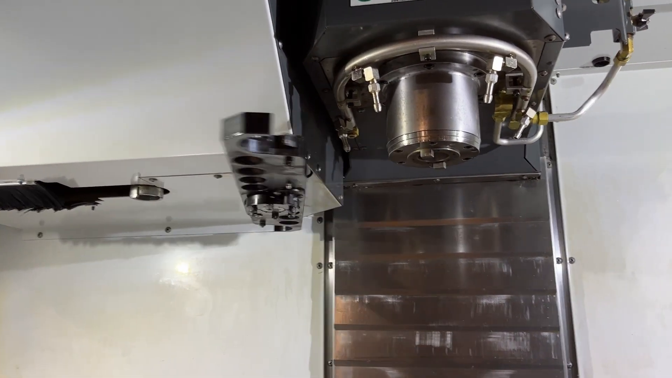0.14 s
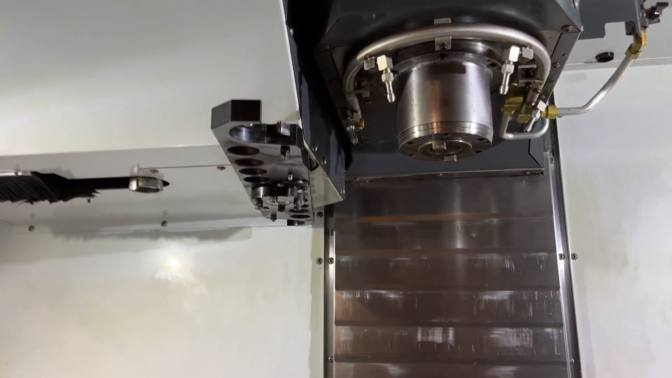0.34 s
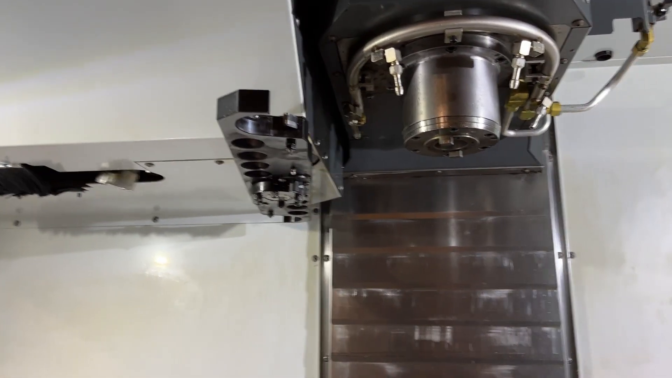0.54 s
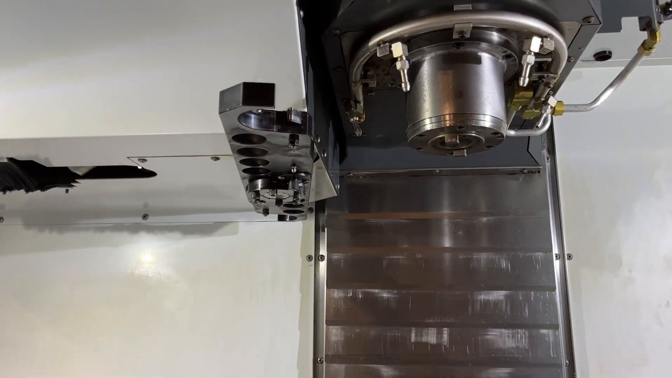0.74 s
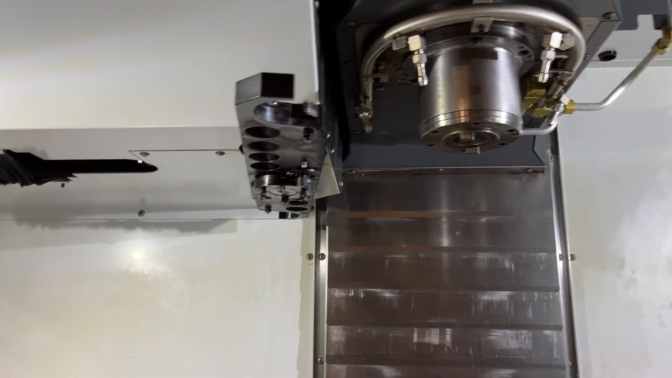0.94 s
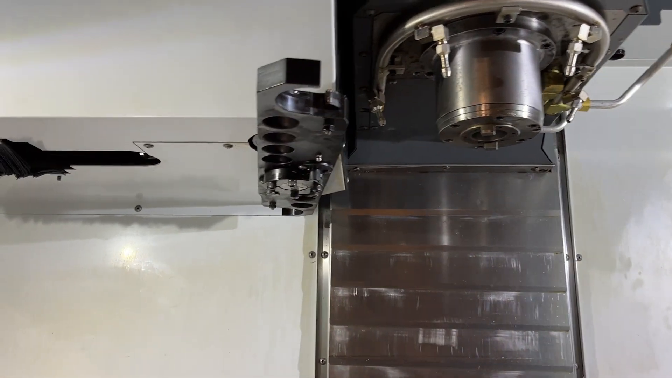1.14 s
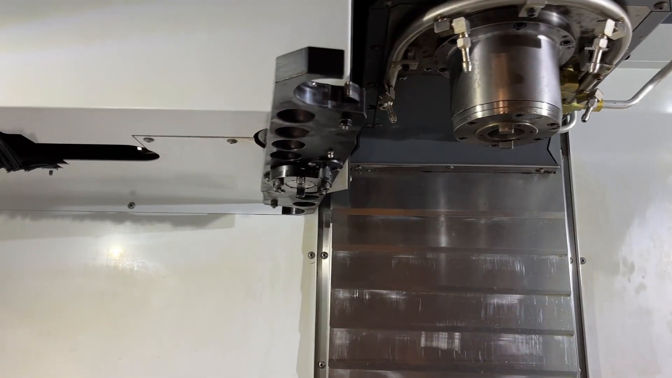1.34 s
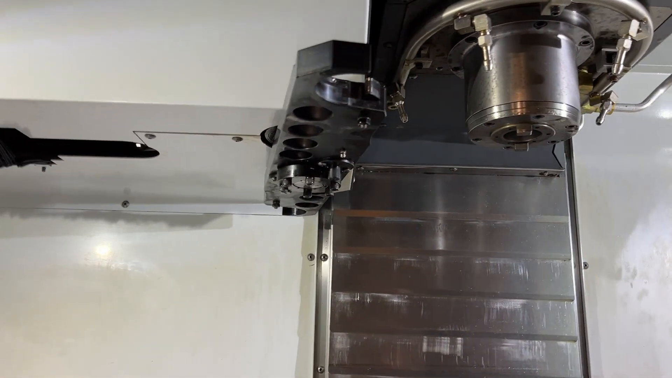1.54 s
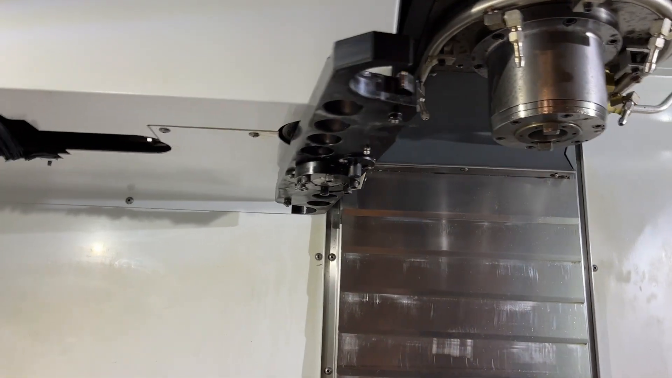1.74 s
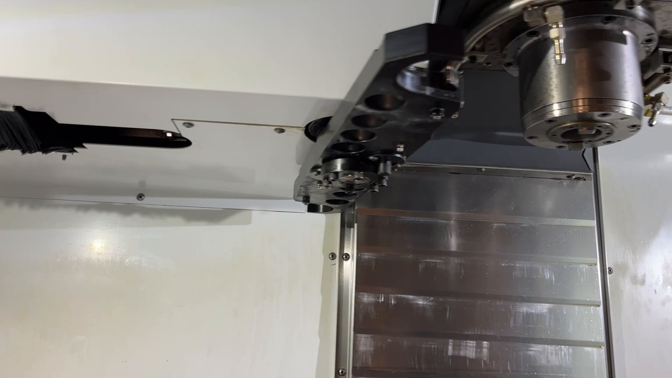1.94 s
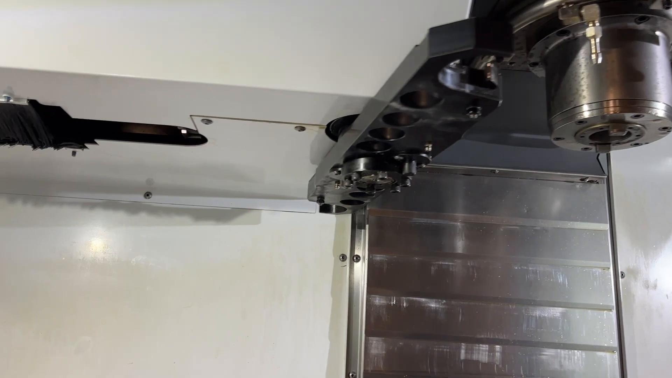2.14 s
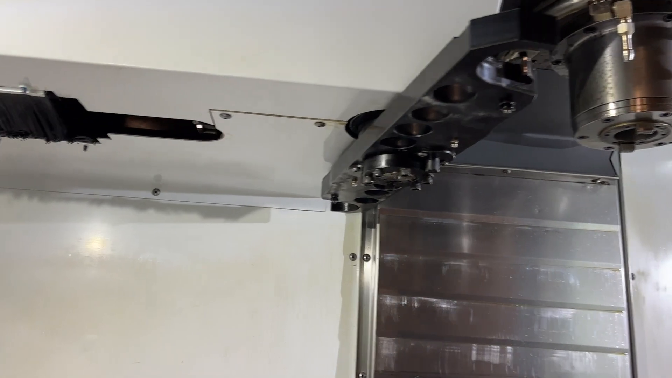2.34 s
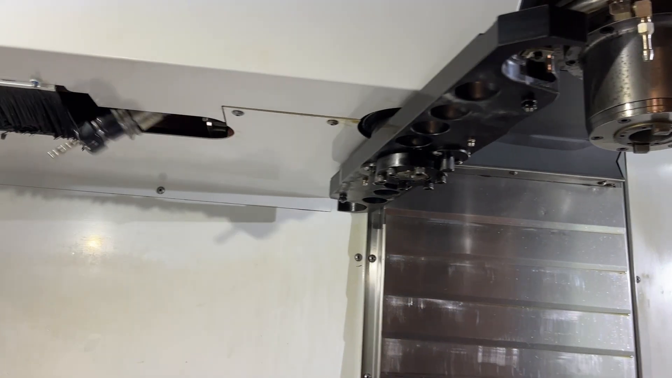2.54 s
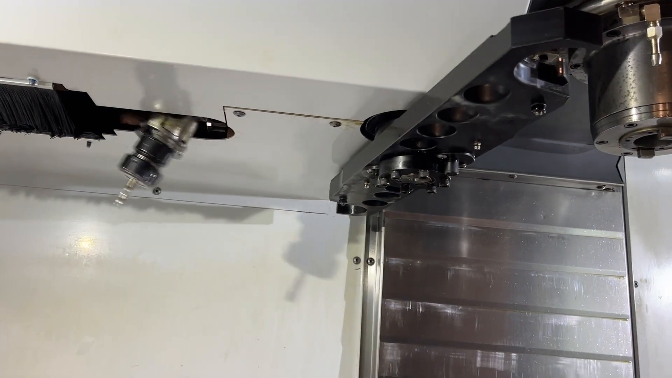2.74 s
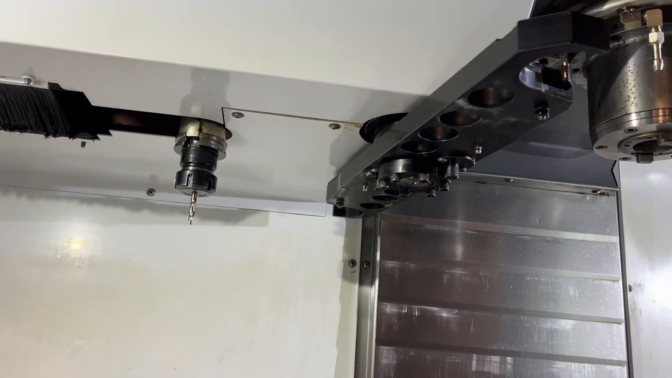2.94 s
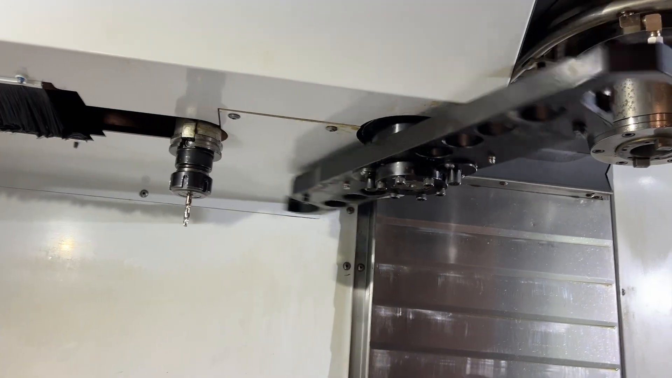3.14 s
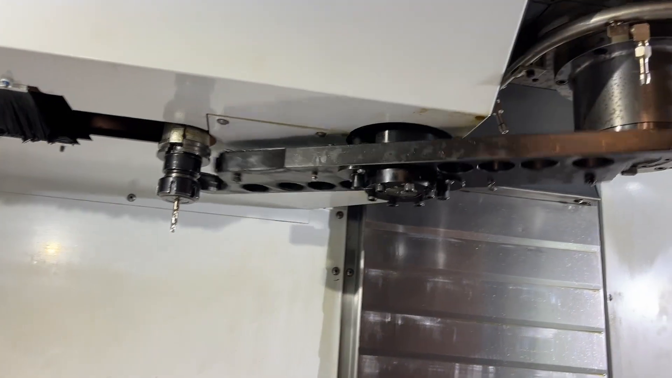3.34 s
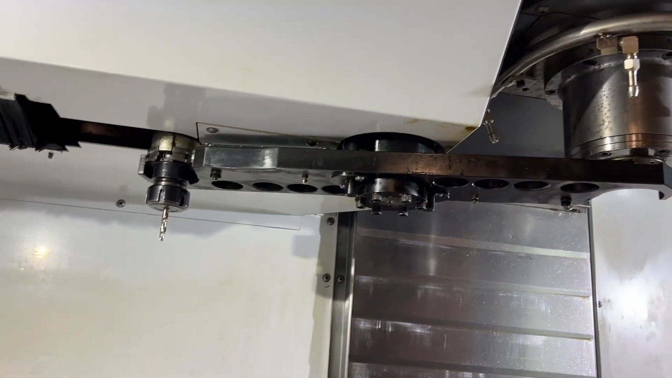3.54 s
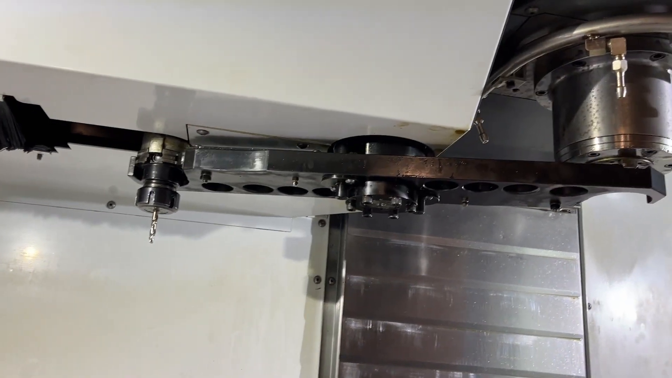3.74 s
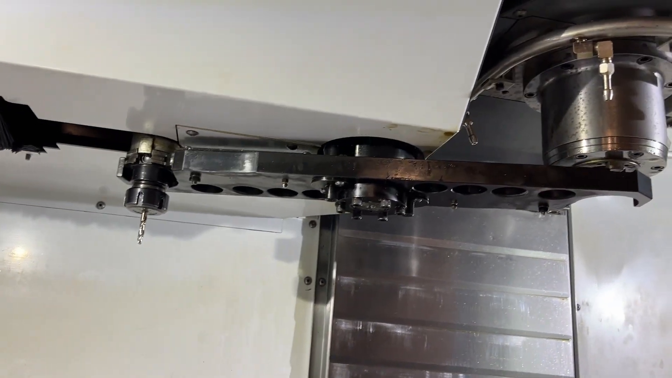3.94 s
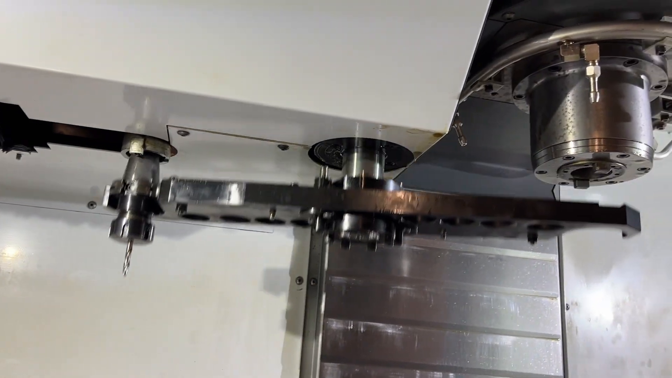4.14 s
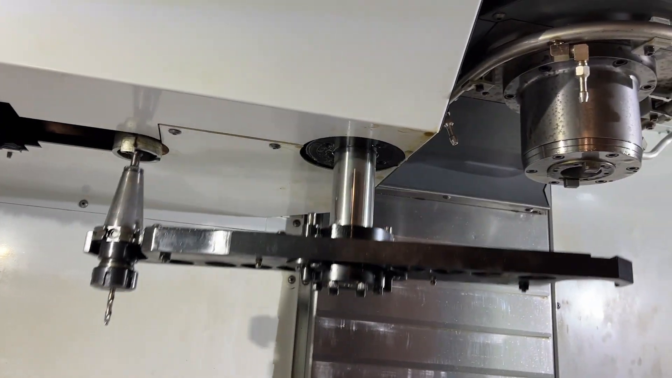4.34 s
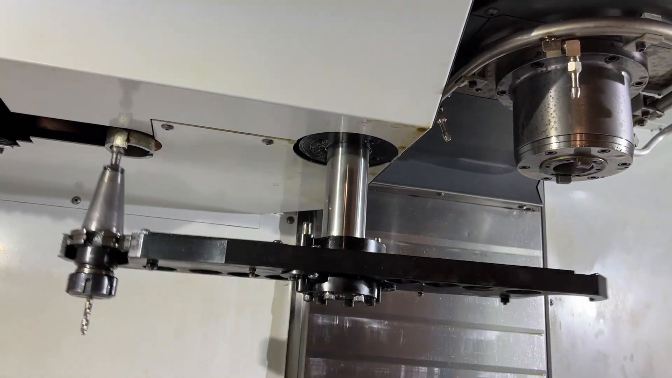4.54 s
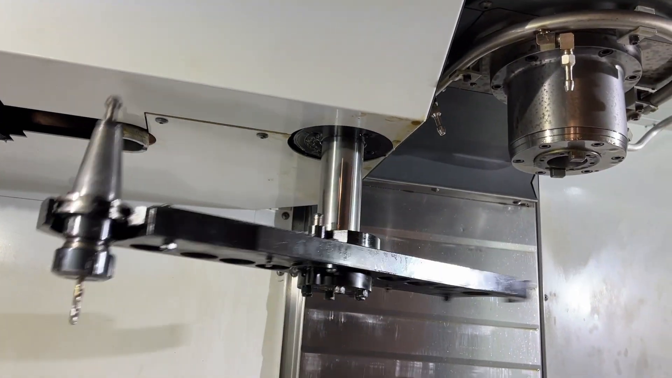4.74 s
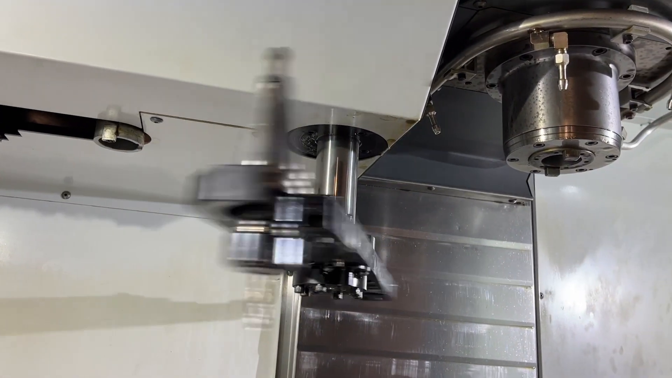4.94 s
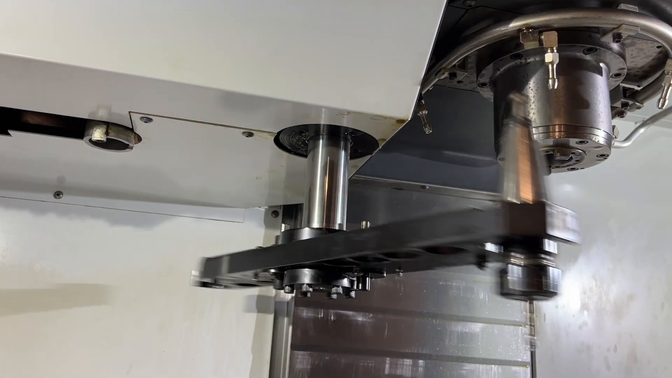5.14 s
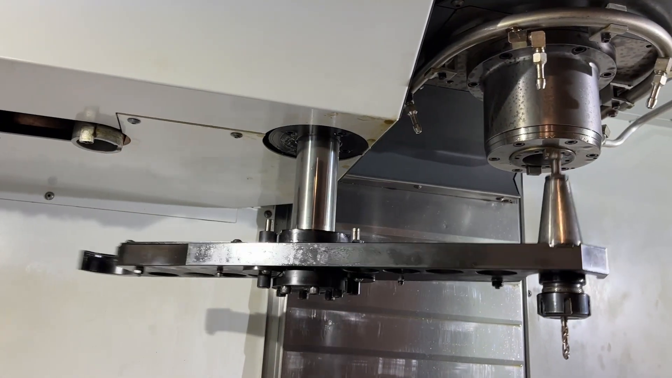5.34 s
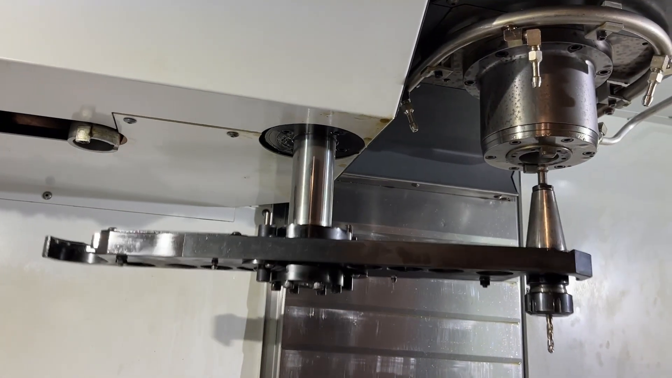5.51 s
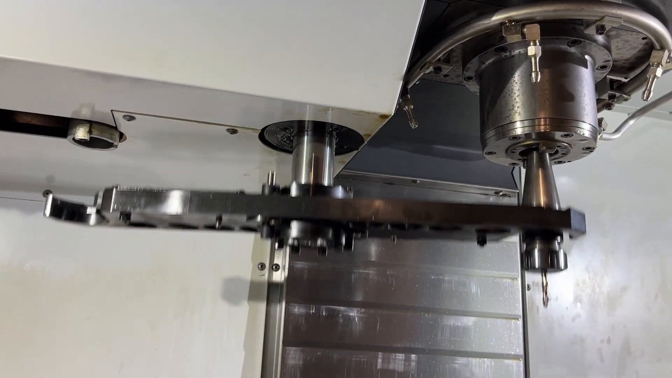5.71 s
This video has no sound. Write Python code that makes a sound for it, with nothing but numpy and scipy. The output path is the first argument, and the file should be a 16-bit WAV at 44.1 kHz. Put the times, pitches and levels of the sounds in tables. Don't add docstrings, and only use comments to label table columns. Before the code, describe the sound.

A machine tool changer hisses and clatters, bangs hard twice, then a loud whistling air blast sings through the empty spindle to the end.

```python
import sys
import numpy as np
from scipy import signal
from scipy.fft import rfft, irfft, next_fast_len
from scipy.io import wavfile
from scipy.ndimage import uniform_filter1d, map_coordinates

SR = 44100
rng = np.random.default_rng(int(sys.argv[2]) if len(sys.argv) > 2 else 0)


def put_to_file(sound):
    columns = np.atleast_2d(sound).T
    safe = np.clip(columns, -1, 1)
    whole_steps = np.round(safe * 32767)
    wavfile.write(sys.argv[1], SR, whole_steps.astype(np.int16))


def volts(x):
    e = np.asarray(x, float) / 20
    return 10 ** e


N = 258867
M = next_fast_len(N + SR // 3)
HZ = np.fft.rfftfreq(M, 1 / SR)


def unit(x):
    return x / np.sqrt(np.mean(np.abs(x) ** 2) + 1e-20)


def along(points, hz):
    f, v = np.transpose(points)
    return np.interp(np.log(hz + 1), np.log(f + 1), v)


def curves(rows):
    s, *cols = np.transpose(rows)
    t = np.arange(N) / SR
    lasts = 1. * (t >= s[0]) * (t <= s[-1] + 1 / SR)
    return [np.interp(t, s, c) for c in cols] + [uniform_filter1d(lasts, size=400, mode="nearest")]


def past(s, knee):
    return knee * np.logaddexp(0, (np.arange(N) / SR - s) / knee)


def grown(s, rise):
    return 1 - np.exp(-np.clip(np.arange(N) / SR - s, 0, None) / rise)


def wobble(rate):
    coarse = np.arange(0, N + 32, 32)
    knots = rng.standard_normal(int(N * rate / SR) + 5)
    return np.interp(np.arange(N), coarse, map_coordinates(knots, [coarse * rate / SR]))


def filtered(x, response):
    return irfft(rfft(x, M) * response(HZ), M)[..., :N]


def modes(table, flip=-1):
    def response(f):
        total = 0
        for k, (centre, width, db) in enumerate(table):
            damping = 1j * f * width
            total = total + flip ** k * volts(db) * damping / (centre * centre - f * f + damping)
        return total
    return response


def noise(response, count=2):
    real, imag = rng.standard_normal((2, count, len(HZ)))
    return unit(irfft((real + 1j * imag) * response(HZ), M)[:, :N])


def narrow(centre_hz, width_hz):
    slow = noise(lambda f: 1 / (1 + (f / width_hz) ** 2), count=4)
    turn = 2 * np.pi * np.cumsum(centre_hz * np.ones(N)) / SR
    return unit(slow[:2] * np.cos(turn) + slow[2:] * np.sin(turn))


def wavering(centre_hz, drift_hz, rate):
    turn = 2 * np.pi * np.cumsum(centre_hz + drift_hz * wobble(rate)) / SR
    return np.sqrt(2) * np.array([np.sin(turn), np.cos(turn)])


def bursts(rows):
    out, t = np.zeros((2, N + SR)), np.arange(SR // 3) / SR
    for s, db, rise, t60, hz in rows:
        burst = volts(db - 60 * t / t60) * (1 - np.exp(-t / rise)) * rng.standard_normal((2, len(t)))
        out[:, round(s * SR):][:, :len(t)] += signal.lfilter(*signal.iirpeak(hz, 1.1, SR), burst)
    return out[:, :N]


def cabinet(x, t60, wet_db):
    t = np.arange(SR // 3) / SR
    tail = rng.standard_normal(len(t)) * volts(-60 * t / t60) * (t > .002)
    tail = tail / np.linalg.norm(tail)
    walls = signal.fftconvolve(x, tail[None], axes=1)[:, :N]
    return (x + volts(wet_db) * walls) / np.hypot(1, volts(wet_db))


def ports(pair, alike, lead):
    # f/Hz, level/dB
    tilt = [(60, 0), (110, 4), (200, 0.5), (380, 2), (700, 0.5), (1290, -3), (2380, 0.5), (4400, 8),
            (8120, -1), (15000, 0.5)]
    turn = np.arccos(np.clip(along(alike, HZ), 0, 1)) / 2
    same, other = rfft(pair, M) * [np.cos(turn), np.sin(turn)]
    half = volts(along(tilt, HZ) / 2) * np.exp(.5j * np.interp(HZ, *np.transpose(lead)))
    return irfft(np.array([(same + other) * half, (same - other) / half]), M)[:, :N]


def workshop():
    # f/Hz, level/dB per Hz
    shop = [(120, 0), (250, -1), (400, 0), (700, -15), (1200, -6.5), (2000, -15.5), (3000, -14.5),
            (5000, -20.5), (7000, -29), (9000, -20.5), (11500, -19.5), (13500, -21.5), (15400, -21)]
    # f/Hz, width/Hz, level/dB
    inverter = [(12100, 90, 7), (12000, 64, -3)]
    colour = lambda f: volts(along(shop, f)) * (f > 600) * (1 + abs(modes(inverter)(f)))
    return cabinet(volts(-45 + 2.5) * noise(colour), t60=0.081, wet_db=-1.0)


def drives():
    # t/s, level/dB
    load = [(0, -41), (.22, -45), (.42, -37), (.78, -41), (.92, -36), (1.2, -36), (1.36, -31.5),
            (1.81, -36.5), (2.1, -39), (2.4, -41.5), (2.888, -38.5), (2.91, -19.5), (3.12, -36.5),
            (3.572, -34.5), (3.6, -28), (4.05, -33), (4.36, -41.5), (5.87, -42)]
    # f/Hz, level/dB per Hz
    drive = [(30, -21), (50, 6.5), (115, -0.5), (170, -3), (260, -3.5), (330, -8), (410, -2.5), (500, -9.5),
             (800, -15.5), (1500, -32.5)]
    rumble_db = curves(load)[0] + 1.04 + 2.07 * wobble(21.98)
    return volts(rumble_db) * noise(lambda f: volts(along(drive, f)) * (f > 20))


def swings():
    # t/s, 68 Hz mode level/dB, 97 Hz mode level/dB, t60/s
    jolts = [(.28, -31, -46, 0.81), (.46, -41, -55, .9), (.8, -36, -52, 1.2), (1.3, -44, -30, 0.75),
             (1.43, -30, -47, 0.97), (1.72, -31, -38, 1.8), (1.93, -29, -53, 1.1), (2.42, -40, -54, 1.5),
             (2.897, -21, -15, 0.27), (2.945, -18, -19, 0.65), (2.98, -24, -17.5, 0.5),
             (3.015, -17, -30, .3), (3.2, -27.5, -34.5, 2.4), (3.36, -30, -21, 0.33),
             (3.577, -8, -10.5, 0.45), (3.665, -27, -13, 0.54), (3.715, -16.5, -28, 0.58),
             (3.93, -21, -29, 3.1), (3.975, -29, -17, 1.2), (4.619, -42, -30, 0.59), (5.18, -33, -52, 2.6),
             (5.45, -43, -33, 0.66)]
    # t/s, width/s, level/dB
    dips = [(2.937, .009, -9), (3.075, 0.013, -7), (3.651, 0.013, -20), (3.705, 0.007, -6),
            (4.16, 0.017, -7)]
    jolt_rise_s, high_t60_share = 0.017, 0.72
    power = volts([-45.5 - 2 * wobble(6), -50 - 2 * wobble(8.2)]) ** 2
    power = np.pad(power, ((0, 0), (0, SR)))
    t = np.arange(SR) / SR
    for s, low_db, high_db, t60 in jolts:
        decay_db = 60 * t / t60 / [[1], [high_t60_share]]
        ringing = volts([[low_db - 1], [high_db + 0.5]] - decay_db) * (1 - np.exp(-t / jolt_rise_s))
        power[:, round(s * SR):][:, :SR] += ringing ** 2
    dip_db = sum(db * np.exp(-((np.arange(N) / SR - s) / width) ** 2) for s, width, db in dips)
    return np.sqrt(power[:, :N]) * volts(dip_db)


def frame():
    low, high = swings()
    return low * wavering(68, 7, rate=18) + high * wavering(97, 5, rate=15)


def tones():
    # start t/s, end t/s, f/Hz, level/dB
    servo = [(0.057, 0.537, 207, -47.5), (1.748, 2.034, 173, -39.5), (1.763, 1.904, 267.7, -38.5),
             (2.58, 2.673, 402, -43), (2.93, 3.16, 415, -39.5), (3.596, 3.716, 469, -28),
             (3.73, 3.99, 415, -39.5), (4.49, 4.914, 96.8, -34), (4.868, 4.989, 143, -43),
             (5.05, 5.242, 150.2, -42.5), (5.62, 5.9, 124, -45.5)]
    t = np.arange(N) / SR
    out = 0
    for start, end, hz, db in servo:
        level = volts(db + 3.1 * wobble(25))
        swell = np.clip(4 * (t - start) * (end - t) / (end - start) ** 2, 0, 1) ** 0.34
        out = out + level * swell * wavering(hz, 5.9, rate=40)
    return out


def vents():
    # opens t/s, tank starts to empty t/s, shuts t/s, body level/dB, top level/dB
    exhausts = [
        (0.295, 1.008, 1.34, -38.5, -37.5),
        (2.092, 2.975, 3.63, -37, -32.5),
    ]
    # f/Hz, level/dB per Hz
    colours = [
        [(600, -16), (1000, -6.5), (1400, -6), (1900, -14.5), (2600, -7), (4000, -6), (5500, -2.5), (7000, -1),
         (9000, 7), (10500, 4.5), (12000, 4.5), (13000, -2), (14000, 3), (15400, -1.5)],
        [(600, -10.5), (1000, -5.5), (1400, -1), (1900, -2), (2600, -5), (4000, -6), (5500, -2.5), (7000, -1),
         (9000, -4), (10500, -11), (12000, -14), (13000, -12.5), (14000, -15.5), (15400, -13)],
    ]
    sag_speeds = [1.22, 0.85]
    # t/s, level/dB
    squeal = [(0.29, -73), (0.306, -48), (0.34, -37), (0.362, -44), (0.41, -50)]
    open_s, shut_s, knee_s, body_lag_s = 0.015, 0.052, 0.031, 0.15
    swell_db_per_s = 3.5
    top_sag_db_per_s, body_sag_db_per_s = 40, 38.5
    top_share = lambda f: 1 / (1 + (8200 / (f + 1)) ** 8)
    out = 0
    for (opens, empties, shuts, body_db, top_db), colour, speed in zip(exhausts, colours, sag_speeds):
        on = grown(opens, open_s) ** 2 * (1 - grown(shuts, shut_s))
        swell_db = swell_db_per_s * past(opens, knee_s)
        body_db = body_db + swell_db - speed * body_sag_db_per_s * past(empties + body_lag_s, knee_s)
        top_db = top_db + 0.54 * swell_db - speed * top_sag_db_per_s * past(empties, knee_s)
        body = noise(lambda f: volts(along(colour, f)) * (1 - top_share(f)) * (f > 500))
        fizz = noise(lambda f: volts(along(colour, f)) * top_share(f))
        jet = volts(body_db + 3.5) * body + volts(top_db + 4.5) * fizz
        out = out + on * volts(0.35 * wobble(20.0)) * jet
    sigh = np.exp(-((np.arange(N) / SR - 1.14) / 0.25) ** 2)
    out = out + volts(-40.5) * sigh * noise(modes([(2900, 800, 0)]))
    squeal_db, on = curves(squeal)
    whistle = narrow(5240, 240) + volts(-3) * narrow(10600, 90)
    out = out + on * volts(squeal_db + 2.5) * whistle
    return cabinet(out, t60=.12, wet_db=-8)


def knocks():
    # t/s, peak level/dB, t60/s, loudest f/Hz
    carriage = [(.435, -20.5, 0.32, 810), (0.489, -26, 0.17, 260), (0.844, -23, 0.15, 900),
                (.879, -21, 0.39, 686), (0.929, -19.5, 0.098, 700), (1.225, -25, 0.38, 800),
                (3.357, -22, 0.3, 300), (.9, -23.5, .15, 400)]
    covers = [(1.322, -22.5, 0.73, 603), (1.406, -23.5, 0.38, 500), (1.462, -18.5, 0.38, 700),
              (1.558, -25, 0.28, 500), (1.633, -22, 0.34, 634), (1.744, -21, 0.29, 643),
              (1.809, -27, .2, 250), (3.98, -16.5, 0.25, 250)]
    pot = [(2.885, -12.5, 0.079, 1000), (2.897, -13.5, 0.28, 700), (2.912, -18, 0.3, 700),
           (2.95, -23.5, 0.48, 450)]
    clamp = [(3.573, -15, 0.32, 930), (3.581, -12.5, 0.34, 500), (3.603, -9.5, 0.19, 600),
             (3.655, -19, 0.95, 450)]
    # brightness level/dB, rise/s
    strikes = [
        (-9.5, 0.0061),
        (-13.5, 0.0075),
        (-7.5, 0.0019),
        (-11, 0.0025),
    ]
    # f/Hz, width/Hz, level/dB
    panel = [(153, 37, 2), (251, 34, -4), (306, 27, -4.5), (415, 48, -1.5), (487, 21, -7), (524, 29, -2.5),
             (643, 146, -6), (843, 66, -5.5), (994, 50, -3), (1200, 140, -6.5)]
    # f/Hz, width/Hz, level/dB
    clang = [(1410, 85, 3.5), (1632, 40, 1), (1797, 55, -1), (2120, 220, -5.5), (2700, 270, -6.5),
             (4200, 940, -10.5), (5540, 320, -9)]
    body, bright = [], []
    for part, (bright_db, rise) in zip((carriage, covers, pot, clamp), strikes):
        for s, db, t60, hz in part:
            body.append((s, db + 16.0, rise, t60, hz))
            bright.append((s, db + bright_db + 13.5, rise, 1.15 * t60, 2200))
    return filtered(bursts(body), modes(panel)) + filtered(bursts(bright), modes(clang))


def rings():
    # t/s, f/Hz, peak level/dB, t60/s
    hard = [(2.887, 1290, -23, .1), (2.888, 607, -18, 0.18), (2.89, 388, -18, .2), (2.893, 332, -22, 0.28),
            (2.896, 500, -17, 0.034), (2.899, 570, -3, .05), (2.901, 442, -17, 0.036),
            (2.902, 763, -20, 0.033), (2.9, 145, -20, .04), (2.89, 1600, -24, 0.089),
            (2.893, 1995, -28, .15), (2.905, 1320, -20.5, 0.13), (2.907, 240, -26, .25),
            (2.911, 419.4, -16.5, 0.24), (2.92, 548, -12.5, .12), (2.935, 890, -21, 0.088),
            (2.945, 563, -17.5, 0.15), (2.948, 164, -22, .05), (2.949, 410.3, -16, .2),
            (3.573, 834, -17, 0.14), (3.574, 982, -17, .04), (3.576, 390, -9, .04), (3.58, 283, -5, 0.037),
            (3.58, 446, -15, 0.09), (3.581, 615, -19.5, 0.08), (3.583, 1550, -24, 0.18),
            (3.586, 200.4, -15.5, 0.37), (3.587, 982, -8.5, 0.058), (3.59, 355, -5, 0.037),
            (3.59, 820, -16, .07), (3.601, 360, -5, 0.044), (3.604, 449, -11.5, 0.13),
            (3.607, 1013, -15, 0.08), (3.634, 841, -17, .07), (3.635, 469, -14, 0.11),
            (3.673, 428, -20, .12)]
    # t/s,
    # f/Hz, peak level/dB, t60/s
    light = [(.4125, 3900, -23, .008), (.413, 1700, -24, .01), (.4135, 700, -24, .015),
             (.437, 425, -27, 0.035), (.441, 1005, -31, .12), (.443, 512, -28.5, 0.14),
             (.456, 219, -26, .05), (.487, 271, -27.5, .12), (.843, 418, -36, 0.25), (.88, 689, -31, 0.38),
             (0.88, 1171, -22.5, .04), (.885, 445, -31, .12), (0.892, 298, -23, 0.11),
             (.895, 371, -28.5, 0.28), (.915, 251, -19.5, 0.045), (.933, 874, -26, .04),
             (.935, 463, -24, 0.078), (.956, 328, -32, 0.19), (.989, 326, -30, .1),
             (1.228, 1047, -36, 0.099), (1.24, 722, -31, 0.14), (1.252, 421, -32, 0.18),
             (1.335, 433, -27.5, .3), (1.335, 1030, -34, 0.18), (1.342, 174, -31, 0.34),
             (1.403, 357, -30, 0.27), (1.417, 251, -21, 0.041), (1.437, 404, -31, 0.18),
             (1.462, 551, -31, 0.32), (1.469, 411, -21, 0.083), (1.479, 324, -28, 0.11),
             (1.48, 996, -27.5, .12), (1.489, 674, -29, .12), (1.522, 404, -23, .045),
             (1.534, 256, -31, .07), (1.56, 353, -21, 0.061), (1.599, 408, -35, .2),
             (1.637, 400, -28, 0.11), (1.657, 376, -28, 0.11), (1.696, 420, -25, .07),
             (1.749, 615, -29.5, 0.31), (1.751, 420, -27, .07), (1.77, 409, -20, .045),
             (1.814, 68, -23, 0.32)]
    out, t = np.zeros((2, N + SR)), np.arange(SR // 3) / SR
    for s, hz, db, t60 in hard + light:
        size = volts(db - 60 * t / t60) * (1 - np.exp(-t / 0.00062))
        out[:, round(s * SR):][:, :len(t)] += size * np.sin(2 * np.pi * hz * t + np.array([[0], [1.3]]))
    return out[:, :N]


def clicks():
    # t/s, level/dB, t60/s, hardness (0-1)
    contacts = [(.4125, -12, .004, .3), (.922, -24, .16, .6), (3.348, -6, .011, 1), (3.577, -17, .04, .8)]
    # f/Hz, width/Hz, level/dB
    latch = [(1130, 720, 5), (2720, 1200, 4.5), (4960, 800, 2), (6700, 900, -1.5)]
    # f/Hz, width/Hz, level/dB
    latch_top = [(9300, 370, 5.5), (11800, 520, 1), (14600, 1400, -11)]
    low = bursts([(s, db + 3.0, .0002, t60, 1800 + 3200 * hard) for s, db, t60, hard in contacts])
    top = bursts([(s, db + 1.5 - 25 * (1 - hard), .0003, t60, 10500) for s, db, t60, hard in contacts])
    for s, db, _, hard in contacts:
        low[0, round(s * SR)] += volts(db + 2)
        top[0, round(s * SR)] += volts(db + 2) * hard ** 4
    return cabinet(filtered(low, modes(latch)) + filtered(top, modes(latch_top)), t60=0.1, wet_db=-2)


def blast():
    voices = [
        (-26, 0.05, 5, 0.85, 6.5),
        (-26.5, 0.032, 1.5, 1, 1),
        (-28, 0.067, 1, 1.4, 11),
        (-32, 0.34, 2, 1.1, 5),
    ]
    # t/s, f/Hz
    bore_pitch = [(3.6, 1050), (5.66, 1065), (5.74, 985), (5.8, 880), (5.87, 790)]
    # f/Hz, width/Hz, level/dB
    bore_modes = [(820, 38, -5.5), (848, 45, -6), (900, 31, -2), (992, 19, 1.5), (1007.4, 15, 1.5),
                  (1055.6, 32, 6.5), (1123, 21, 4.5), (1191, 24, 3.5), (1226, 24, -3), (1255, 66, -5),
                  (1390, 46, -11)]
    # f/Hz, width/Hz, level/dB
    mouth_modes = [(2711, 43, -5.5), (3450, 18, -10), (3450, 17, -9.5), (3530, 18, -5), (3544, 18, 3.5),
                   (3582, 16, 0.5), (3640, 17, 2.5), (3720, 17, 1), (3785, 22, -8)]
    # f/Hz, width/Hz, level/dB
    taper_modes = [(1532, 26, -1.5), (1803, 170, -6.5), (2040, 130, -10.5), (2297, 20, 1), (2486, 51, -3),
                   (2745, 59, -1.5), (3022, 9, 4), (3055, 30, -0.5), (3158, 21, 2), (3210, 20, 0),
                   (3909, 35, 4), (3993, 33, 1.5), (4080, 21, 0), (4175, 21, -3), (4320, 45, -12),
                   (4563, 35, -4), (5070, 33, -11.5), (6070, 25, -10), (6520, 37, -13.5), (7540, 81, -28),
                   (7800, 94, -10), (7340, 140, -19)]
    # f/Hz, level/dB per Hz
    jet_colour = [(300, -19.5), (600, -5.5), (750, -2), (2500, -4.5), (4300, -22), (5600, -15),
                  (7000, -3.5), (8600, -14), (9600, -2), (10200, -2), (10600, 3.5), (11050, 1),
                  (11400, -7.5), (13800, -5), (14400, -4), (15500, -8)]
    # f/Hz, half width/Hz, level/dB
    quiet_bands = [(1748, 83, -20.5), (2920, 34, 1), (4380, 83, -4), (4760, 100, -2), (5640, 610, -9.5),
                   (5520, 79, -4), (5160, 110, -3), (6330, 76, -9)]
    starts_s = 3.634
    bore_hz, on = curves(bore_pitch)[0], grown(starts_s, 0.0062)
    surge = np.exp(-((np.arange(N) / SR - 3.96) / 0.29) ** 2)
    closing = np.log2(np.minimum(bore_hz / bore_hz[0], 1))
    levels = []
    for db, rise, over_db, own_db, loss_db in voices:
        build_db = 20 * np.log10(grown(starts_s, rise) + 0.037)
        levels.append(db + build_db + over_db * surge + own_db * wobble(18) + loss_db * closing)
    bore_db, mouth_db, taper_db, jet_db = levels
    flutter = wobble(25)
    edge_tone = wavering(bore_hz, 80, rate=300) + .55 * narrow(bore_hz, 130)
    bore = unit(filtered(edge_tone, modes(bore_modes, flip=0.88))) * volts(bore_db + 1.0 + .5 * flutter)
    mouth = noise(modes(mouth_modes, flip=1.0)) * volts(mouth_db + 2.0 + 0.5 * flutter)
    filling_db = .6 * flutter + .65 * np.minimum(jet_db + 36, 0)
    taper = noise(modes(taper_modes)) * volts(taper_db + 3.5 + filling_db)
    jet = noise(lambda f: volts(along(jet_colour, f))) * volts(jet_db + 6.5 + .5 * flutter)
    gaps = lambda f: volts(sum(db * np.exp(-((f - c) / w) ** 2) for c, w, db in quiet_bands))
    return filtered(on * (bore + mouth + taper) + cabinet(on * jet, t60=0.1, wet_db=3), gaps)


def scene():
    # f/Hz, likeness (0-1)
    alike = [(60, 1), (300, 0.88), (700, 0.24), (2000, 0.73), (5200, 0.32), (7000, 0.25), (8200, 0.94),
             (9500, 0.8), (11800, 0.83), (13500, 0.87), (15200, 0.94)]
    alike_spindle = [(60, 0.68), (600, 1), (1050, 0.9), (1500, 0.68), (2500, 0.73), (3300, 0.46), (3900, 1),
                     (5500, 0.33), (7000, 0.7), (7800, 0.85), (8700, 0.99), (9400, 0.73), (11800, .98),
                     (13800, 0.82), (15300, 0.67)]
    # f/Hz, phase/rad
    lead = [(0, 0.1), (120, -0.1), (430, 0.3), (1380, -2), (1810, -1), (2760, 1), (4650, -0.1), (5510, -2),
            (6370, -1), (6720, -2), (8870, -3.5), (11200, -6), (12700, -6.5), (14600, -9), (15200, -8.5)]
    lead_arm = [(0, -1.8), (5000, -0.91), (9000, -1.6), (15200, -1.6)]
    lead_spindle = [(0, -5), (430, -1), (780, -1.75), (1030, 1), (1550, -3), (1810, 0.12), (3880, 1.2),
                    (6120, 0.1), (7000, -2.5), (7600, -3), (8900, -3), (10000, -4.5), (11200, -6.5),
                    (12600, -7), (15200, -9.5)]
    changer = workshop() + drives() + frame() + tones() + vents() + knocks() + rings()
    arm = ports(clicks(), alike, lead_arm)
    spindle = ports(blast(), alike_spindle, lead_spindle)
    return ports(changer, alike, lead) + arm + spindle


def low_pass(x):
    return signal.sosfilt(signal.butter(12, 15620, fs=SR, output="sos"), x)


def record(dry):
    held = dry / (1 + np.abs(dry / .95) ** 8) ** (1 / 8)
    shared_top = filtered(held.mean(axis=0), lambda f: (f > 15170) * (f < 15750))
    mix = filtered(held, lambda f: f < 15750) - shared_top
    return low_pass(mix)


dry = scene()
out = record(dry)
put_to_file(out)
```